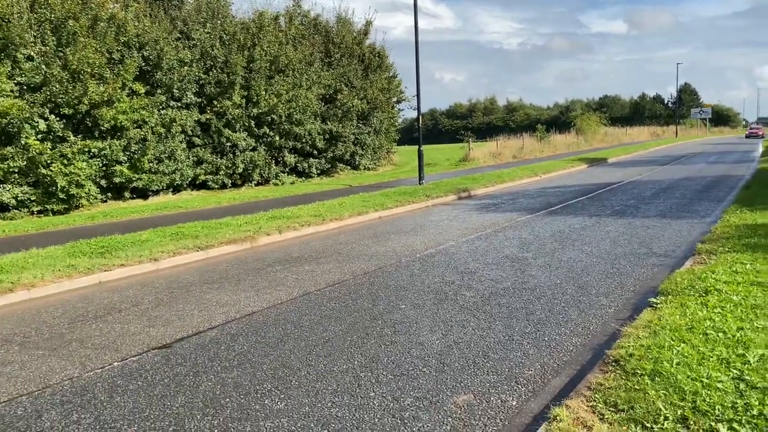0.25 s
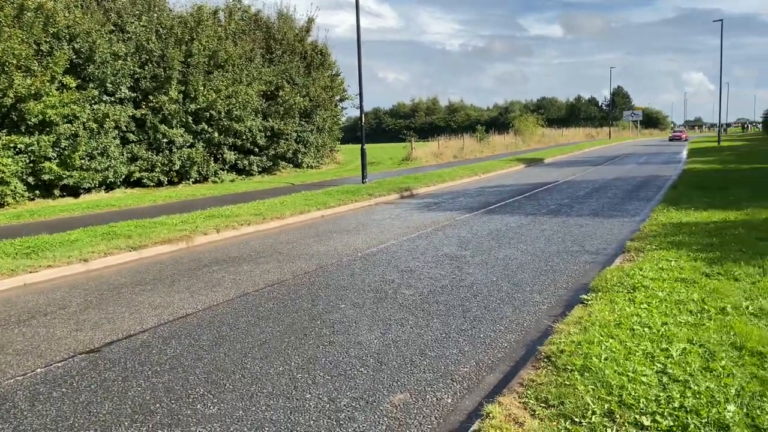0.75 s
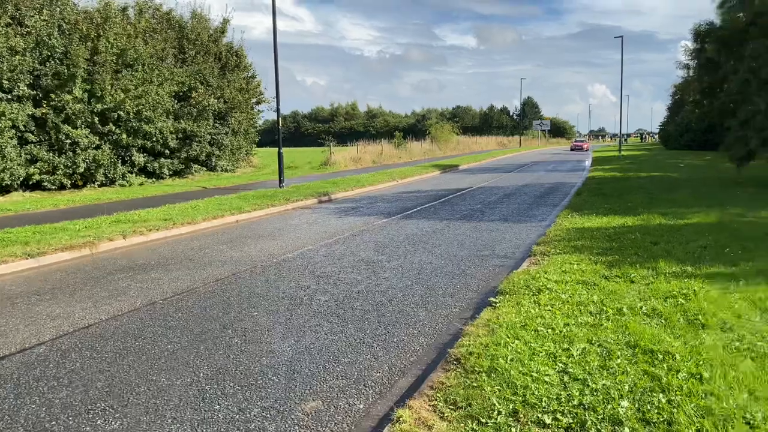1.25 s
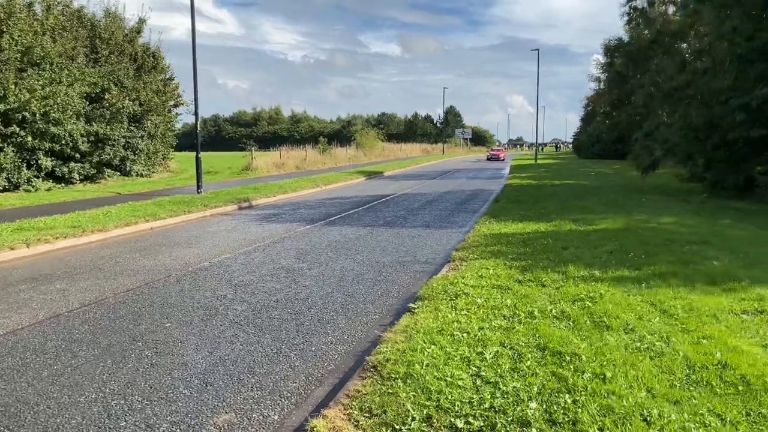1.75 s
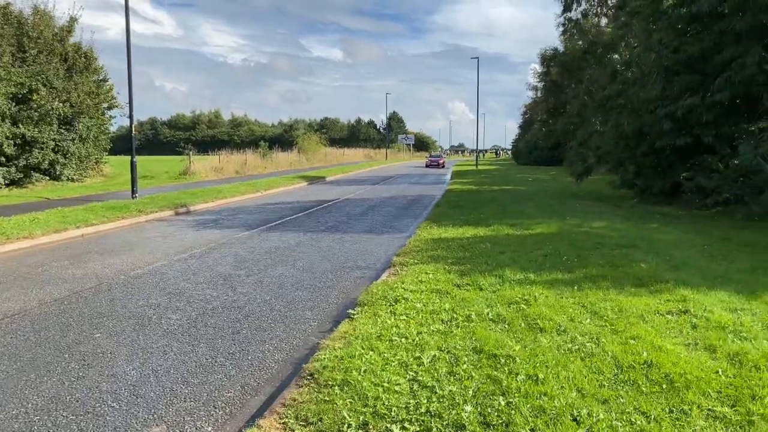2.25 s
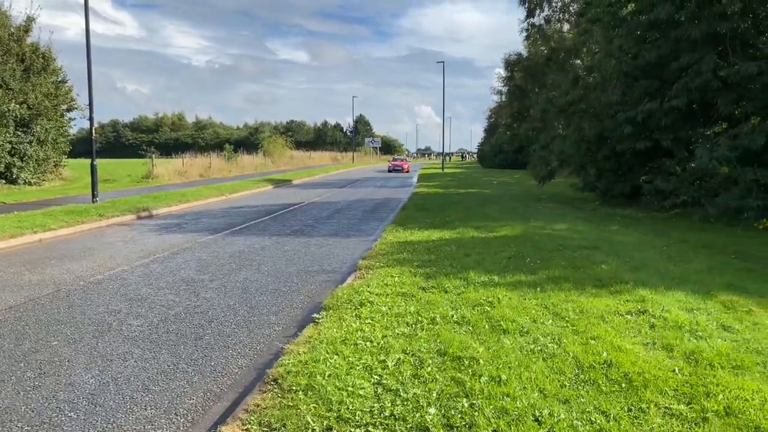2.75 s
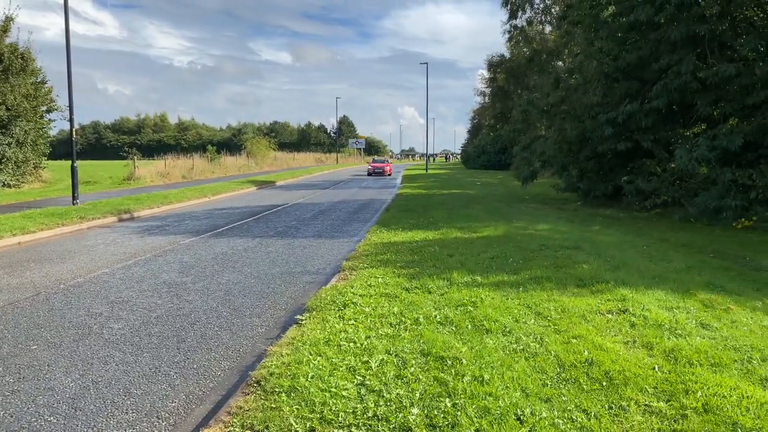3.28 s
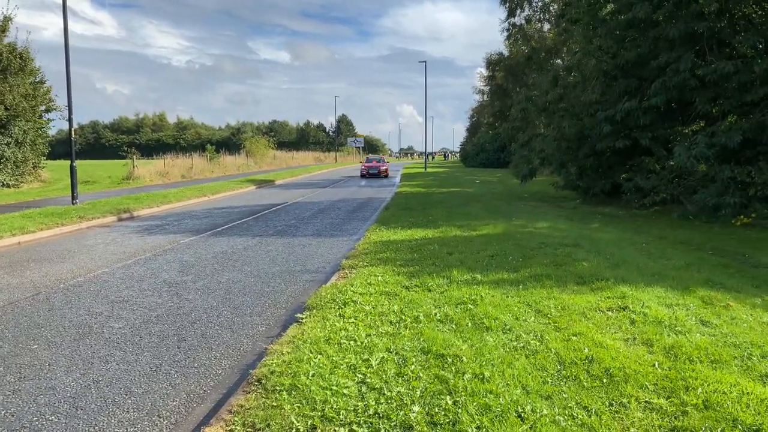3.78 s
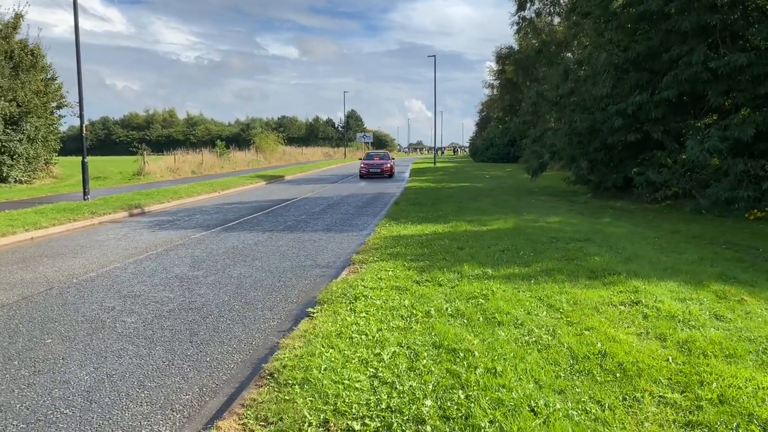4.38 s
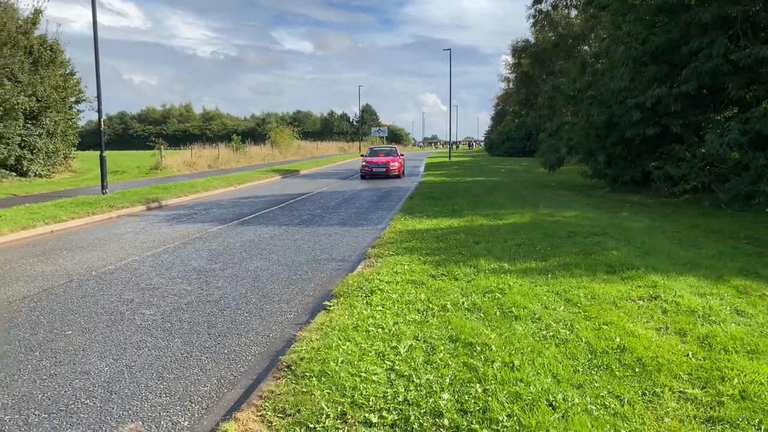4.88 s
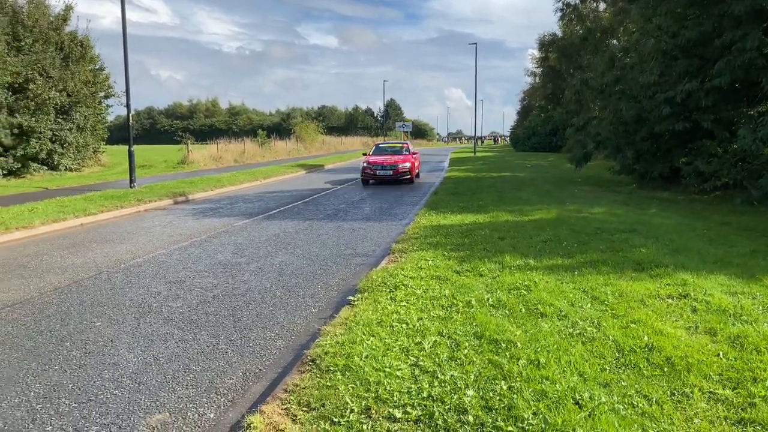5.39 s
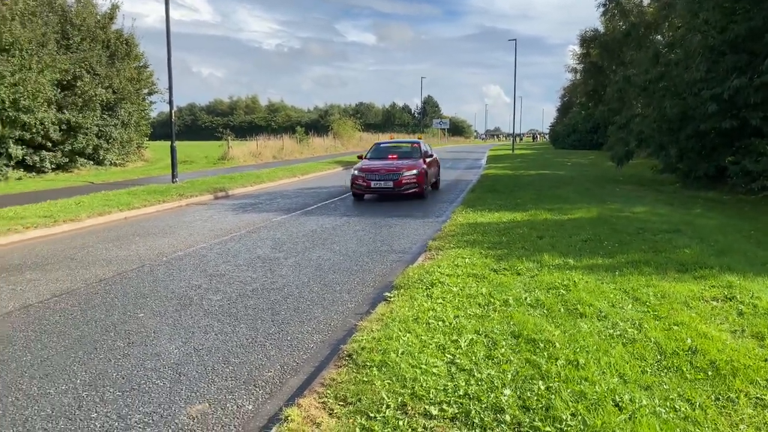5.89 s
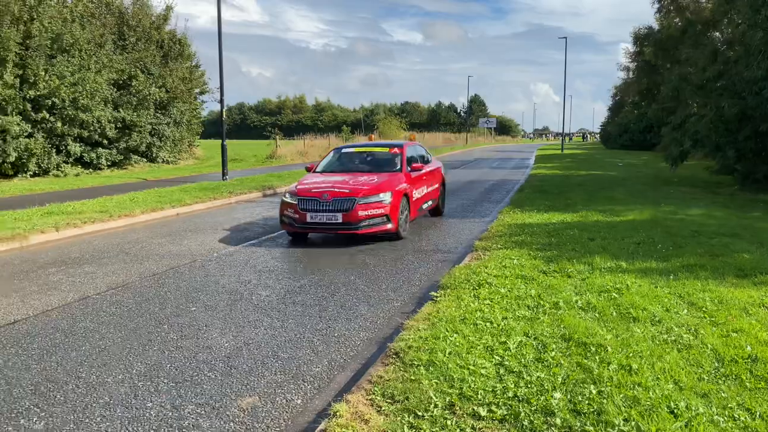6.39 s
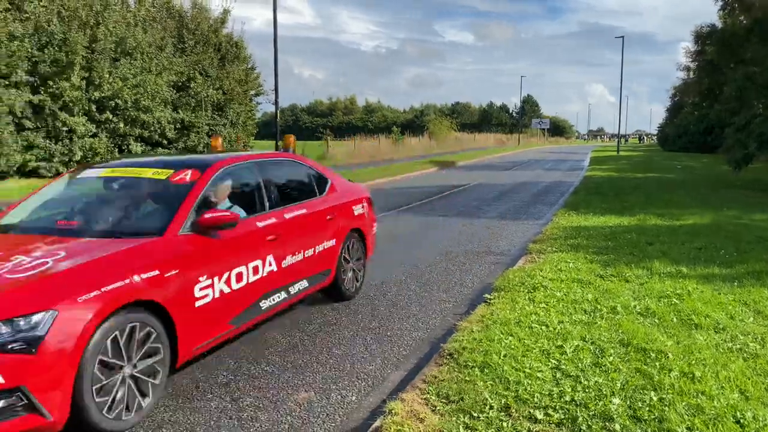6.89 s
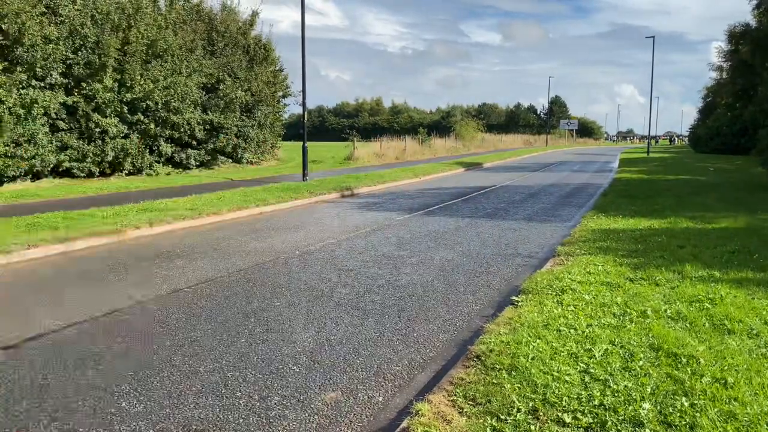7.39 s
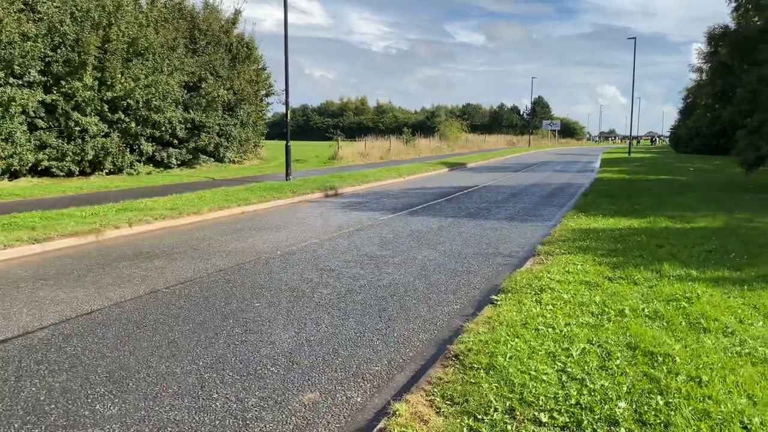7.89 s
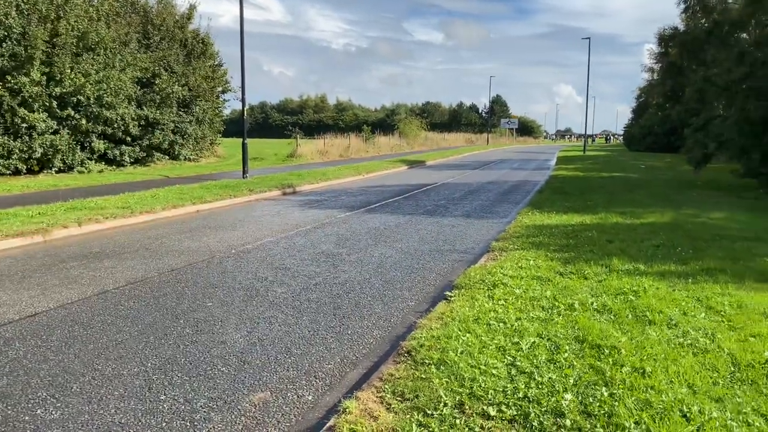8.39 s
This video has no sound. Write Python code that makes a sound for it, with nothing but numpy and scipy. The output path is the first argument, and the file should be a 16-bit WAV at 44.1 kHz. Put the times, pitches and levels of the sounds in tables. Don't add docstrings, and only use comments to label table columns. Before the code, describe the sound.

Stereo handheld microphone on a windy grassy verge. First a motorcycle departs left with a rough, rising engine note and chain hiss, shifts up and thins into a low drone. Soft thuds of wind and a few tiny metallic taps follow. Then a car's tyres grow into a broad rush, peak close by around seven seconds, and drop away to faint road hum.

```python
import sys
import numpy as np
from scipy import signal
from scipy.fft import rfft, irfft, next_fast_len
from scipy.io import wavfile
from scipy.ndimage import map_coordinates

SR = 44100
rng = np.random.default_rng(int(sys.argv[2]) if len(sys.argv) > 2 else 0)


def volts_from_db(level):
    exponent = np.asarray(level, float) / 20
    return 10 ** exponent


def digitize_waveform(pressure):
    field = np.atleast_2d(pressure).T
    bounded = np.clip(field, -1, 1)
    quanta = np.round(bounded * 32767).astype(np.int16)
    wavfile.write(sys.argv[1], SR, quanta)


N = 381448
STEP = 64

# time [s], lead of left [samples], scattered share [0-1].
BIKE_LEAD = [(0, 19.3, 0.1), (.5, 19.3, 0.1), (1, 17.1, 0.15), (1.5, 14.2, 0.06), (2, 11, 0.26),
             (2.5, 8.9, 0.42), (3.5, 8, .4), (8.65, 7.5, 0.35)]
# time [s], lead of left [samples], scattered share [0-1].
CAR_LEAD = [(0, 0.84, 0.41), (5, 0.85, 0.33), (6.5, 1, .12), (6.8, 1.9, 0.19), (7, 9.5, 0.63),
            (7.15, 13.3, 0.6), (7.35, 19, 0.11), (7.6, 18, .04), (8, 13.5, .05), (8.65, 11.5, 0.072)]
# upper edge [Hz], stretch of the lead [ratio],
# left-right per lead [dB/sample], left-right [dB], reach of scatter [ratio].
SHADOW = [(220, 2.12, 0.105, -2, 0.79), (524, 1.69, 0.174, 0, 0.46), (1302, 1.33, 0.17, 1.9, 0.61),
          (3500, 1.036, 0.1064, 0.5, 1.1), (8300, 1.035, 0.2, 4, 1.1), (16000, 0.015, 0.12, -3, 3.0)]


def coarse(rows):
    s, *columns = np.transpose(rows)
    grid_s = np.arange(N // STEP + 1) * STEP / SR
    return np.array([np.interp(grid_s, s, column) for column in columns])


def fine(slow):
    return np.interp(np.arange(N) / STEP, np.arange(len(slow)), slow)


def at_hz(points, hz):
    point_hz, point_db = np.array(points).T
    return np.interp(np.log(hz), np.log(point_hz), point_db)


def drift(rate_hz):
    r = np.exp(-2 * np.pi * STEP * rate_hz / SR)
    slow = signal.lfilter([1], [1, -2 * r, r * r], rng.standard_normal(N // STEP + 1001))[1000:]
    return slow / slow.std()


def ring(clicks, hz, t60_s):
    r, w = volts_from_db(-60 / (t60_s * SR)), 2 * np.pi * hz / SR
    return signal.lfilter([0, np.sin(w)], [1, -2 * r * np.cos(w), r * r], clicks + 1e-18)


def ports(x, lead, zone):
    _, stretch, shade_db, tilt_db, _ = SHADOW[zone]
    sides = []
    for side in (.5, -.5):
        read_at = np.arange(N) + fine(side * stretch * lead)
        sides.append(map_coordinates(x, [read_at], order=3, mode="nearest"))
    return np.array(sides) * volts_from_db([[.5], [-.5]] * fine(shade_db * lead + tilt_db))


def noise_source(levels, bands_hz, colour, direction, patchy_db, rate_hz):
    known_hz = [np.sqrt(low * high) for low, high in bands_hz]
    colour_db = [[10 * np.log10(high - low) + at_hz(colour, np.sqrt(low * high))] for low, high in bands_hz]
    excess_db = coarse(levels) - colour_db
    bottom_hz, top_hz = colour[0][0], colour[-1][0]
    edges_hz = np.geomspace(bottom_hz, top_hz, int(2.5 * np.log2(top_hz / bottom_hz)) + 1)
    white, together = rng.standard_normal((2, 3, N)), drift(2.3)
    lead, scatter = coarse(direction)
    zones = {}
    for k, (low, high) in enumerate(zip(edges_hz, edges_hz[1:])):
        hz = np.sqrt(low * high)
        weights = [np.interp(np.log(hz), np.log(known_hz), row) for row in np.eye(len(bands_hz))]
        gain_db = at_hz(colour, hz) + weights @ excess_db + 10 * np.log10(SR / 2)
        gain_db = gain_db + patchy_db * (0.48 * together + drift(rate_hz))
        band_pass = signal.butter(2, [low, high], "band", fs=SR, output="sos")
        band = signal.sosfilt(band_pass, white[k % 2])
        zone = min(np.searchsorted(np.array(SHADOW)[:, 0], hz), len(SHADOW) - 1)
        zones[zone] = zones.get(zone, 0) + fine(volts_from_db(gain_db)) * band
    out = 0
    for zone, x in zones.items():
        share = fine(np.clip(scatter * SHADOW[zone][-1], 0, 1))
        out = out + np.sqrt(1 - share) * ports(x[0], lead, zone) + np.sqrt(share) * x[1:]
    return out


def exhaust():
    # time [s], firing rate [Hz], orders 1, 2, 3, 4 [dB].
    near = [(0.0, 28.3, -39, -24, -26, -22), (0.16, 30.73, -44, -25, -25, -21),
            (0.32, 32.98, -41, -25, -24, -23), (0.48, 34.76, -39, -25, -24, -24),
            (0.64, 35.85, -38, -25, -23, -25), (0.8, 37.81, -36, -26, -22, -30),
            (0.96, 40.02, -34, -27, -21, -30), (1.12, 42.47, -29, -25, -22, -31),
            (1.28, 45.59, -27, -24, -20, -32), (1.44, 48.5, -24, -25, -22, -33),
            (1.6, 51.84, -28, -27, -25, -36), (1.76, 54.7, -29, -24, -26, -40),
            (1.92, 57.69, -27, -23, -29, -43), (2.08, 61.41, -27, -22, -29, -46),
            (2.24, 63.92, -26, -23, -32, -42), (2.4, 66.95, -26, -28, -35, -40),
            (2.56, 71.1, -23, -26, -37, -52), (2.72, 73.48, -23, -27, -40, -56),
            (2.88, 76.51, -24, -28, -44, -64), (3.04, 79.71, -24, -30, -47, -67),
            (3.2, 82.23, -24, -31, -43, -62), (3.28, 82.8, -25, -37, -44, -65),
            (3.36, 77.43, -27, -33, -48, -62), (3.44, 73.0, -26, -30, -49, -64),
            (3.52, 66.42, -28, -29, -47, -64), (3.6, 62.49, -33, -29, -48, -63),
            (3.68, 60.16, -27, -28, -35, -55), (3.78, 60.56, -33, -30, -37, -49),
            (3.9, 61.73, -34, -31, -35, -50), (4.12, 63.91, -35, -29, -34, -59),
            (4.34, 66.23, -32, -32, -40, -51), (4.56, 68.98, -28, -33, -39, -58),
            (4.78, 71.2, -31, -33, -40, -57), (5.0, 73.4, -32, -35, -46, -53),
            (5.22, 75.82, -29, -37, -48, -75), (5.44, 76.68, -31, -38, -44, -54),
            (5.66, 79.48, -30, -40, -63, -52), (5.88, 81.18, -31, -37, -43, -64),
            (6.1, 83.6, -33, -39, -39, -54)]
    away = [(6.6, 87.95, -36, -37, -42, -56), (7.1, 89.46, -31.5, -37, -48, -50),
            (7.6, 90, -36.5, -42, -57, -63), (8.2, 87.5, -33.5, -48.5, -56.5, -71),
            (8.65, 89, -37, -44, -53, -64)]
    # frequency [Hz], level [dB].
    silencer = [(85, 11), (130, 12.5), (170, 2.5), (205, -2), (240, -14.5), (300, -15.5), (350, -20.5),
                (430, -16), (520, -24.5), (600, -45), (900, -39)]
    # time [s], turbulence [ratio], loss of the upper orders [dB].
    path = [(0, 0.44, -4), (.5, 0.33, -0.5), (1.1, .35, 1.5), (2, 0.5, 3), (2.6, 0.51, 8), (3.3, 0.69, 13),
            (8.65, 1.44, 18.5)]
    rate_hz, *order_db = coarse(near + away)
    turbulence, loss_db = coarse(path)
    firing_hz = fine(rate_hz * (1 + .002 * turbulence * drift(6.0)))
    firing_phase = 2 * np.pi * np.cumsum(firing_hz) / SR
    out = np.zeros(N)
    for k in range(1, 19):
        if k <= 4:
            level_db = order_db[k - 1]
        else:
            silencer_db = at_hz(silencer, k * rate_hz) - at_hz(silencer, 3 * rate_hz)
            level_db = order_db[2] - loss_db + silencer_db
        pipe_phase = 2 * np.arctan((k * rate_hz - 92) / 25)
        flutter_db = turbulence * (1.3 + 0.34 * k) * drift(10.0)
        order = np.cos(k * firing_phase - fine(pipe_phase))
        out += np.sqrt(2) * fine(volts_from_db(level_db + flutter_db)) * order
    return ports(out, coarse(BIKE_LEAD)[0], zone=0), firing_phase


def bike_hiss(firing_phase):
    # time [s], levels at 450, 2200, 6000, 10000 Hz [dB].
    near = [(0.0, -35, -43, -47, -59), (0.01, -38, -46.5, -58.5, -59), (0.43, -38.5, -48.5, -55, -63),
            (0.97, -41.5, -51, -50, -67), (1.42, -50.5, -49.5, -49, -79), (1.7, -44.5, -51, -48, -76),
            (1.87, -52, -52, -49, -79), (2.18, -60, -51, -49, -75), (2.2, -63, -52, -50, -78),
            (2.29, -46.5, -49.5, -50.5, -85), (2.85, -48, -54, -51, -75), (3.2, -61, -49.5, -53.5, -86),
            (3.68, -55, -57, -57.5, -85), (4.41, -46, -50, -56, -70), (4.91, -50, -56, -54, -78),
            (4.98, -44, -45, -54.5, -67), (5.08, -46, -44, -55, -79), (5.18, -45, -54, -56, -72),
            (5.24, -48, -53, -56, -81), (5.6, -45, -51, -59.5, -77)]
    away = [(6.6, -55, -63, -52, -63), (8.65, -74, -63, -53, -72)]
    # frequency [Hz], density [dB per Hz].
    colour = [(250, -12), (330, -5.5), (450, -1), (580, -12.5), (1000, -21), (2000, -11.5), (3500, -21),
              (6000, -20), (7800, -21.5), (10000, -31), (12000, -36), (14000, -34), (15600, -44)]
    bands_hz = [(320, 590), (1700, 2600), (4800, 7000), (9200, 11700)]
    hiss = noise_source(near + away, bands_hz, colour, BIKE_LEAD, patchy_db=1.3, rate_hz=20)
    return hiss * (1 + 0.13 * np.cos(firing_phase - 1.2))


def tyre_roar():
    # time [s], levels at 280, 500, 830, 1900 Hz [dB].
    away = [(0, -70, -68, -60, -70), (2.5, -57, -66, -47.5, -57.5)]
    near = [(3.6, -50, -57, -42.5, -56), (3.65, -36.5, -55, -40, -56), (3.71, -49, -56, -42.5, -52.5),
            (4.12, -41, -52, -41.5, -46), (4.15, -50, -57, -43, -47.5), (4.35, -40, -52, -38.5, -51),
            (4.43, -59, -56, -38.5, -46), (4.48, -38, -50, -36, -47), (4.54, -47, -49, -44, -45),
            (4.6, -45, -50, -38.5, -45), (5.05, -45, -49, -38, -46.5), (5.09, -40, -57, -37, -47),
            (5.19, -48, -49, -41, -44), (5.27, -38.5, -48, -37.5, -44), (5.68, -40.5, -46, -33.5, -41.5),
            (6.37, -31.5, -39, -25.5, -36.5), (6.44, -36, -36.5, -25, -36),
            (6.81, -24.5, -31.5, -19, -34.5), (6.95, -24, -26, -20.5, -31),
            (7.17, -27.5, -28, -16.5, -34.5), (7.45, -34, -25.5, -33.5, -34),
            (7.55, -35.5, -37, -29, -39.5), (8.07, -58, -64, -46, -44.5), (8.21, -40.5, -69, -55, -43),
            (8.23, -44, -63, -46, -44), (8.48, -58, -69, -41, -45.5), (8.54, -38, -69, -46, -46),
            (8.61, -48, -75, -47, -45), (8.65, -47, -53, -45, -46)]
    # frequency [Hz], density [dB per Hz].
    colour = [(60, -20), (110, -9), (250, -0.5), (380, -9), (540, -14), (640, -6.5), (850, 1.5), (1030, -8),
              (1500, -14), (2000, -20), (3100, -27)]
    bands_hz = [(220, 360), (420, 720), (650, 996), (1300, 1660)]
    return noise_source(away + near, bands_hz, colour, CAR_LEAD, patchy_db=1.0, rate_hz=12)


def spray():
    # time [s], levels at 3700, 6000, 10000, 13700 Hz [dB].
    away = [(0, -71, -62, -72, -84), (3, -66, -64, -71, -82.5)]
    near = [(4.0, -61, -69, -74, -86), (4.14, -58, -62, -73, -86), (4.18, -61, -63, -69, -79),
            (4.26, -60, -68, -83, -78), (4.36, -49, -57, -67, -69), (4.47, -62, -71, -78, -84),
            (4.5, -55, -63, -82, -79), (4.57, -56, -60, -67, -76), (4.72, -59, -65, -78, -76),
            (4.93, -62, -58, -75, -76), (4.97, -55, -47, -70, -75), (5.09, -64, -66, -81, -79),
            (5.16, -59, -56, -65, -74), (5.25, -59, -62, -79, -68), (5.29, -59, -59, -70, -75),
            (5.94, -54, -60, -68, -71), (6.26, -49, -59, -65, -62), (6.68, -48.5, -54, -64, -63),
            (6.99, -45.5, -51, -54, -53), (7.33, -49, -59, -58, -55), (7.47, -69, -52, -66, -61),
            (7.77, -54, -48, -70.5, -71), (8.25, -58, -54, -81, -82), (8.47, -62, -68, -83, -82),
            (8.57, -61, -56, -77, -89), (8.63, -64, -62, -84, -79), (8.65, -61, -65, -67, -70)]
    # frequency [Hz], density [dB per Hz].
    colour = [(3100, -2.5), (4000, -4), (6000, -8), (7600, -10), (10000, -16.5), (12000, -14), (14000, -18),
              (15600, -22)]
    bands_hz = [(3200, 4950), (4800, 7200), (9200, 10180), (12800, 13900)]
    return noise_source(away + near, bands_hz, colour, CAR_LEAD, patchy_db=1.5, rate_hz=19)


def bumps():
    # time [s], peak level [dB], frequency [Hz], left-right [dB].
    gusts = [(2.529, -7.5, 110, -7), (2.83, -12, 110, -3.0), (3.4, -14, 111, -1.0), (3.656, -12, 110, 7),
             (3.668, -11, 109, -7), (4.068, -15, 110, -8), (4.104, -5, 111, -5), (4.339, -16, 110, 5),
             (4.489, -21, 110, -11), (4.789, -13, 110, 4), (5.119, -21, 110, 4), (7.859, -25, 110.1, -5),
             (8.049, -25, 109.8, 0.0), (8.185, -11, 109.6, 7), (8.258, -17, 110, -1.0),
             (8.544, -18, 110, 17)]
    out, t = np.zeros((2, N)), np.arange(-2000, 2000) / SR
    for s, peak_db, hz, pan_db in gusts:
        envelope = np.exp(-(t * hz / .55) ** 2)
        slap = -volts_from_db(peak_db - 7) * np.cos(2 * np.pi * hz * t + 0.34) * envelope
        start = round((s + .006) * SR) - 2000
        out[:, start:start + len(t)] += slap * volts_from_db([[.5 * pan_db], [-.5 * pan_db]])
    return out


def clinks():
    # time [s], peak level [dB], share that rings [0-1].
    tap_rows = [(4.345, -40, 0.1), (4.36, -40, .05), (4.9606, -32, 0.76), (4.9894, -38, .8),
                (5.16, -34, 0.4), (5.6594, -34, 0.35), (7.638, -38, 0), (7.7094, -36, .1)]
    # frequency [Hz], level [dB], t60 [s].
    modes = [(2754, 0, 0.22), (4310, -3.5, .35), (5004, -1, .1), (6300, 1.5, .2), (5787, -7, .1),
             (8270, -7, .12), (9684, -9, 0.049)]
    s, peak_db, rings = np.transpose(tap_rows)
    at = (s * SR).astype(int)
    luck_db, ringing = rng.normal(0, 2.9, (len(at), len(modes))), np.zeros(N)
    for k, (hz, level_db, t60_s) in enumerate(modes):
        clicks = np.zeros(N)
        clicks[at] = rings * volts_from_db(peak_db + level_db - 9.5 + luck_db[:, k])
        ringing += ring(clicks, hz, t60_s)
    taps = np.zeros(N)
    taps[at] = volts_from_db(peak_db - 18)
    decay = signal.lfilter([1], [1, -volts_from_db(-60 / (.03 * SR))], taps)
    crack = decay * np.diff(rng.standard_normal(N + 1))
    return (ringing + crack) * volts_from_db([[-3], [2]])


def far_traffic():
    # time [s], levels at 830, 1700 Hz [dB].
    levels = [(0, -53.5, -55.5), (1.2, -45.5, -59), (2, -45, -52), (3, -46.5, -49), (4.5, -47, -49),
              (6.5, -57, -33), (8, -41, -47.5), (8.65, -44, -47.5)]
    # frequency [Hz], density [dB per Hz].
    colour = [(260, -38), (450, -5), (498, -14.5), (744, -1), (910, -12.5), (1020, 3), (1810, 2.5),
              (2770, -21.5), (4000, -39), (5200, -62), (8800, -120)]
    # time [s], lead of left [samples], scattered share [0-1].
    direction = [(0, -18.5, 0.35), (8.65, -23, 0.28)]
    return noise_source(levels, [(650, 970), (1300, 2930)], colour, direction, patchy_db=1.1, rate_hz=12)


def wind():
    # time [s], levels at 45, 110 Hz [dB].
    levels = [(0, -36, -22), (.08, -50, -41), (1.5, -52, -43), (2.4, -46, -33), (3.3, -43, -38),
              (4.5, -40.5, -35), (5.5, -45, -39.5), (6.5, -46, -35), (7.5, -43, -33), (8.65, -49, -36)]
    # frequency [Hz], density [dB per Hz].
    colour = [(25, -38), (40, -6), (65, 2.5), (110, -1.5), (180, -8), (300, -27), (500, -47.5)]
    # time [s], lead of left [samples], scattered share [0-1].
    direction = [(0, 5.4, 0.051), (8.65, 11, 0.17)]
    return noise_source(levels, [(30, 53.6), (80, 157)], colour, direction, patchy_db=3.5, rate_hz=6.2)


def scene():
    pipe, firing_phase = exhaust()
    bike = pipe + bike_hiss(firing_phase)
    car = tyre_roar() + spray()
    return bike + car + bumps() + clinks() + far_traffic() + wind()


def shape(x, response):
    size = next_fast_len(N)
    hz = np.arange(1, size // 2 + 2) * SR / size
    return irfft(rfft(x, size) * volts_from_db(at_hz(response, hz)), size)[:N]


def top_cut(x):
    return signal.sosfilt(signal.butter(12, 15690, fs=SR, output="sos"), x)


def record(dry):
    # frequency [Hz], level [dB].
    mid_treble = [(7300, 0), (8200, -8.5), (8800, -11.5), (9000, -1), (10900, 1.5), (11800, -20),
                  (12400, -28), (13000, 2), (14600, 0), (15400, -34), (15700, -64)]
    # frequency [Hz], level [dB].
    side_treble = [(6300, 1.5), (6900, -5), (7700, -3), (9000, -1), (9700, -27), (10800, -21),
                   (11200, 5.5), (12900, 2.5), (13500, -23), (14700, -19), (15300, -8), (15900, -42)]
    low_cut = signal.butter(2, 38, "high", fs=SR, output="sos")
    left, right = signal.sosfilt(low_cut, dry)
    mid = shape((left + right) / 2, mid_treble)
    side = shape((left - right) / 2, side_treble)
    return top_cut(np.array([mid + side, mid - side]))


dry = scene()
out = record(dry)
digitize_waveform(out)
```